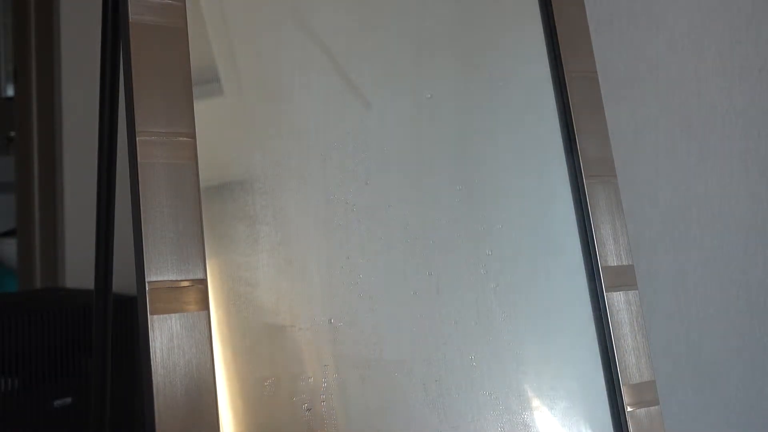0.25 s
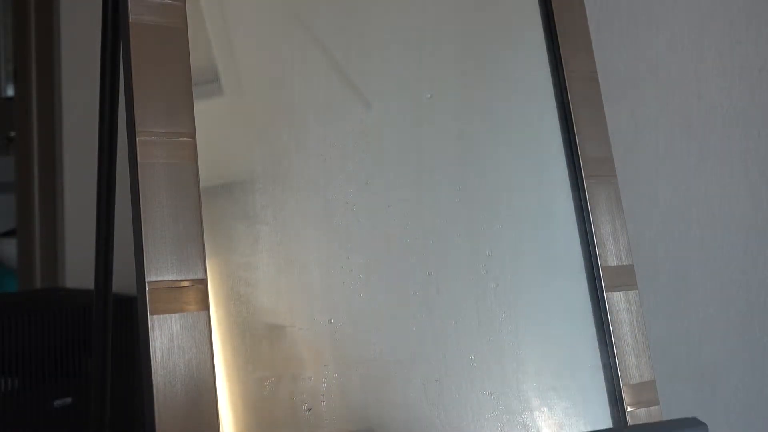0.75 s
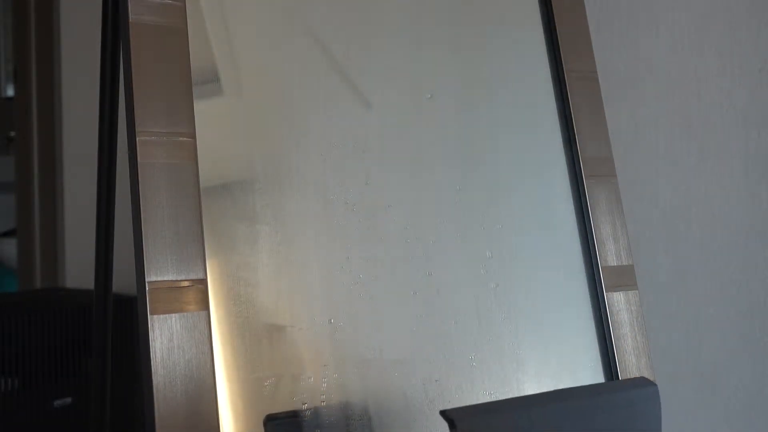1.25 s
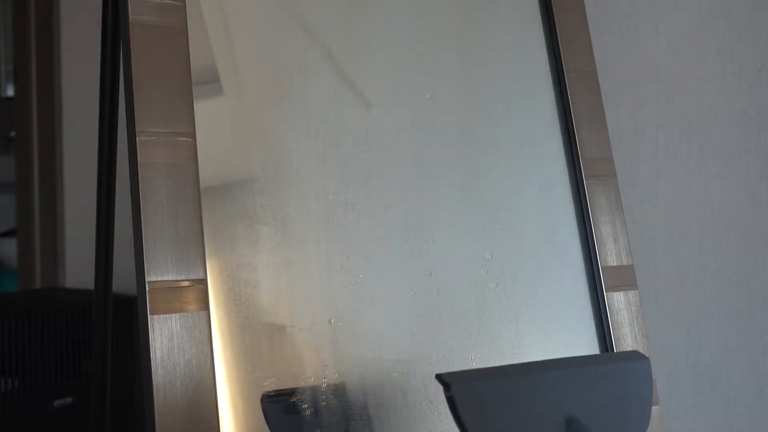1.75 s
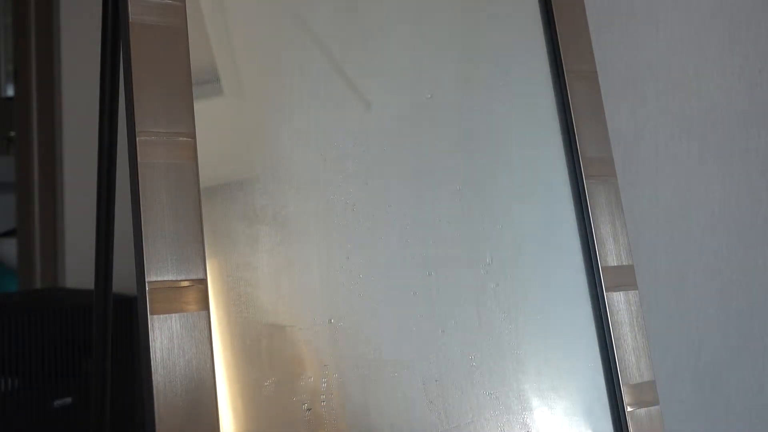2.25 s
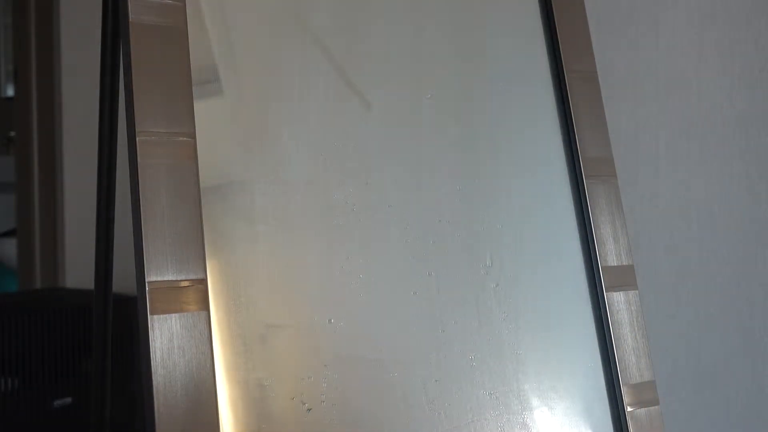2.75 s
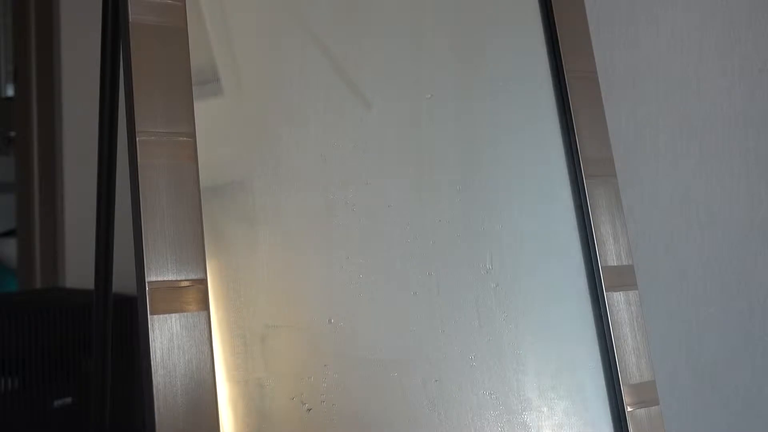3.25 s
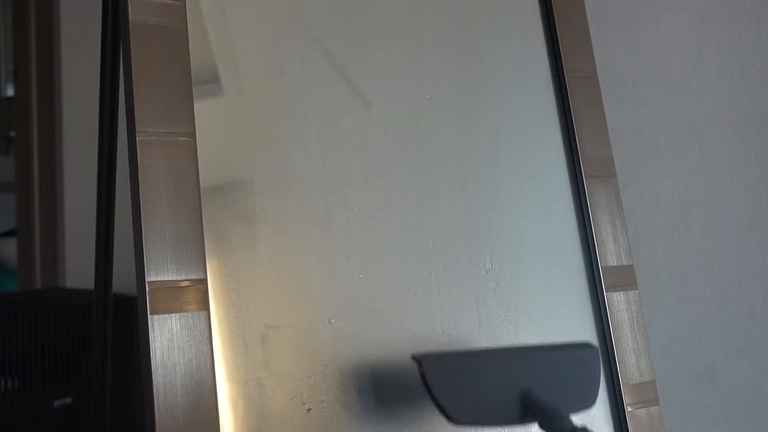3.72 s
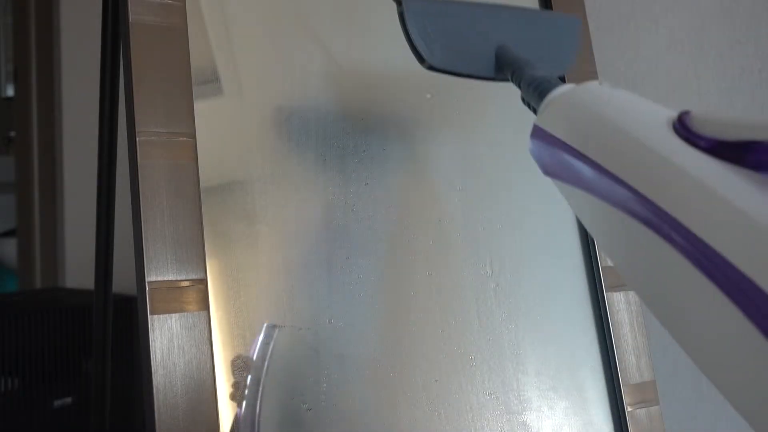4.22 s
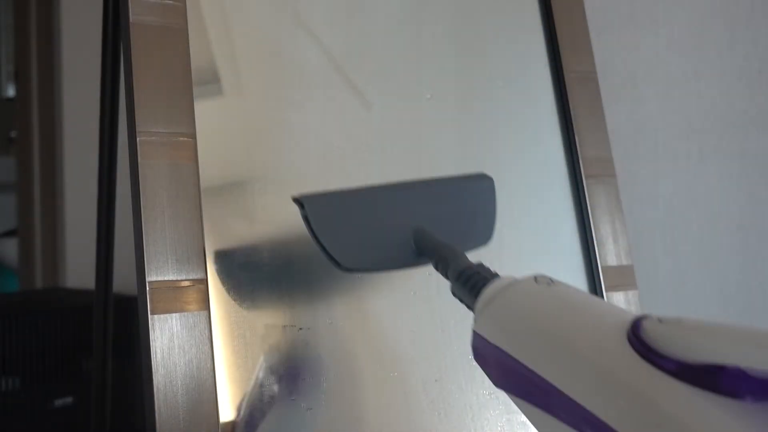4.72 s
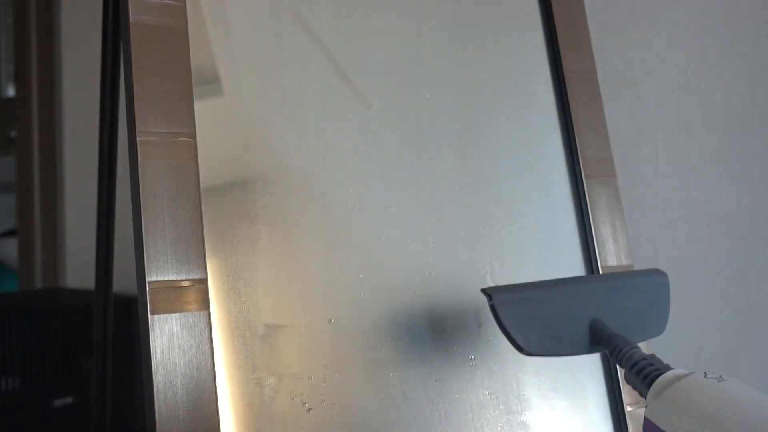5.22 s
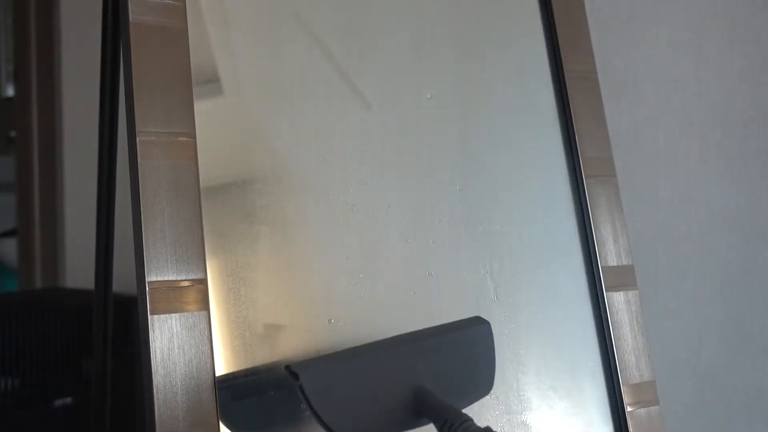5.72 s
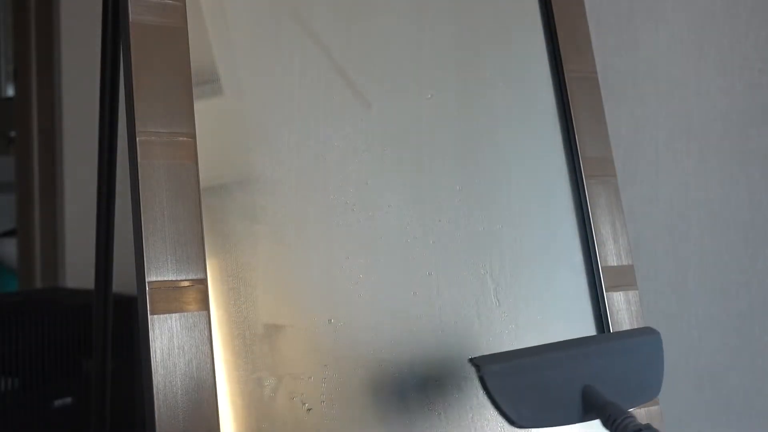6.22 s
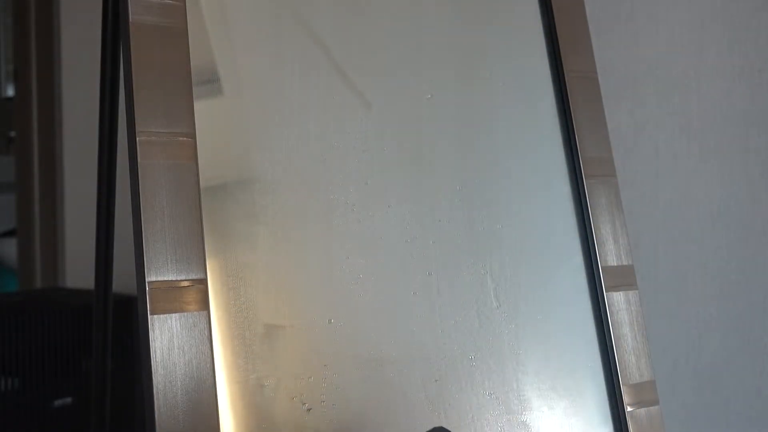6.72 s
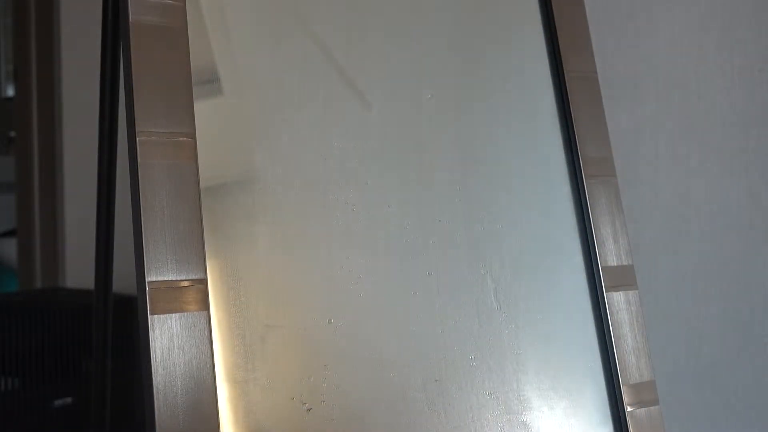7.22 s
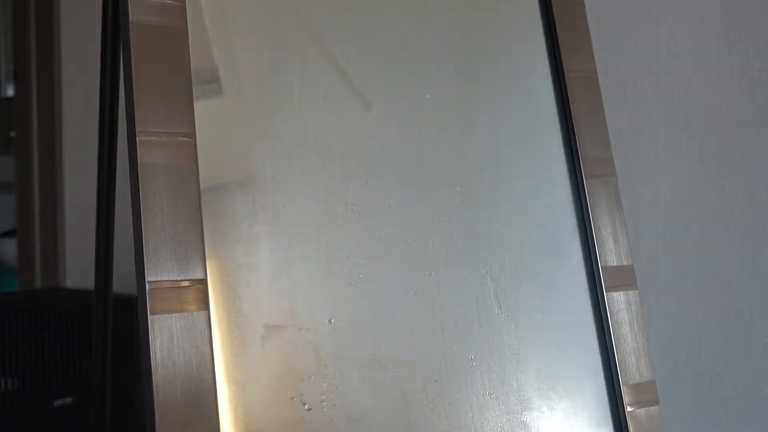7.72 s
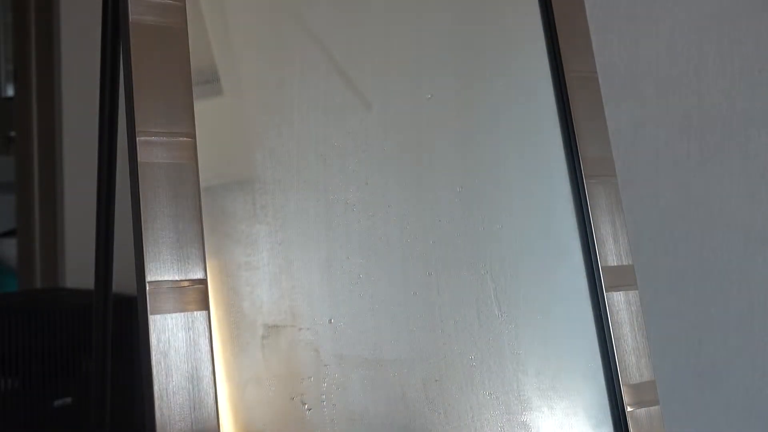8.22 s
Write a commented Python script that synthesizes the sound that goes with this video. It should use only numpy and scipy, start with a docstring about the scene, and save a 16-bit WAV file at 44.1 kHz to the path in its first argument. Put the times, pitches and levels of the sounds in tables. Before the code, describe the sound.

A handheld steam cleaner hisses loudly and steadily close by in a small room, whooshes once, then sags and fades with a falling whistle.

```python
"""A handheld steam cleaner is swept over a mirror in a small room, close to the microphone.
Turbulent hiss and its echo off the glass comb each other, and the hiss deepens at each pass of the head.
A breathy resonance whistles and sinks; then the nozzle is lifted once and high noise bands whoosh by.
As the pressure runs out the hiss fades under a second falling whistle and the ring of the head's cavity.
Last come a faint tick, a soft knock of decaying body modes and the thin singing of the wet slit."""
import sys
import numpy as np
from scipy import signal
from scipy.fft import rfft, irfft
from scipy.io import wavfile
from scipy.ndimage import uniform_filter1d, map_coordinates

SR = 44100
rng = np.random.default_rng(int(sys.argv[2]) if len(sys.argv) > 2 else 0)


def master(y):
    """Save y as 16-bit WAV."""
    cut = np.clip(np.atleast_2d(y).T, -1, 1)
    pcm = np.round(cut * 32767)  # scale
    wavfile.write(sys.argv[1], SR, pcm.astype(np.int16))


N = 373086
TIME = np.arange(N) / SR
BINS = np.maximum(np.fft.rfftfreq(N, 1 / SR), 1)   # Hz
CUTOFF_HZ = 15750

# echo off the glass, later as the nozzle draws back: [time_s, delay_ms, strength (0-1)]
GLASS_ECHO = [(0, .5, 0.4), (.37, 0.48, 0.39), (.8, 0.6, 0.35), (1.9, 0.61, 0.44), (2.5, 0.25, 0.3),
              (2.8, 0.2, 0.18), (3.2, .25, 0.28), (3.85, .2, 0.27), (4.1, 0.29, .2), (4.37, 0.44, 0.16),
              (4.7, 0.35, 0.23), (5.25, 0.27, 0.2), (5.85, 0.35, 0.37), (6.25, 0.3, 0.17),
              (6.85, 0.36, 0.57), (7.5, .28, 0.37), (8.46, 0.36, 0.04)]
# side-to-side strokes of the nozzle at their turning points: [time_s, left_ear_lead_us]
STROKES = [(0, -14), (.25, -14), (.55, -13), (1.0, -4), (2.1, -2), (2.6, -3.5), (3.25, -13.5), (3.85, -7.5),
           (4.85, 10), (5.22, -9), (5.85, 9), (6.27, -8), (6.7, 14), (7.05, 6), (7.5, -28)]
# steam flow, steady, sagging, then running out: [time_s, level_db (re full flow)]
STEAM_FLOW = [(0, 0), (1.9, -0.5), (3.3, -0.25), (4.0, -3), (4.8, -3.1), (5.9, -3), (6.6, -9.5),
              (7.0, -19.5), (7.38, -30), (7.85, -38), (8.46, -63)]
# low modes of the room: [centre_hz, width_hz, lift_db]
LOW_MODES = [(233, 29, 5), (332, 24, 5.5), (424, 25, 3)]


def from_db(db):
    """Amplitude ratio of a level: 20 dB per factor of ten."""
    return 10 ** (np.asarray(db) / 20)


def rms_one(x):
    """Normalisation to unit mean power."""
    return x / np.sqrt(np.mean(x ** 2) + 1e-20)


def in_time(rows):
    """Linear interpolation of each column of a curve to every sample."""
    s, *columns = np.transpose(rows)
    return [np.interp(TIME, s, column) for column in columns]


def at_hz(points, hz):
    """Interpolation of a spectrum on a log-frequency axis."""
    known_hz, values = np.transpose(points)
    return np.interp(np.log(hz), np.log(known_hz), values)


def swell(s, half_width_s):
    """Gaussian pulse of height 1 around a moment, falling to 1/e at the half width."""
    return np.exp(-((TIME - s) / half_width_s) ** 2)


def drift(rate_hz):
    """Low-passed random process of unit power: two equal poles at the rate, run at SR / 20."""
    pole = np.exp(-40 * np.pi * rate_hz / SR)
    noise = rng.standard_normal(N // 20 + 2002)
    slow = signal.lfilter([1], [1, -2 * pole, pole * pole], noise)[2000:]
    return np.interp(np.arange(N) / 20, np.arange(len(slow)), rms_one(slow))


def breathy_tone(hz, width_hz):
    """Narrow-band noise of unit power: random quadrature modulation of a moving carrier."""
    phase = 2 * np.pi * np.cumsum(hz) / SR
    in_phase = drift(width_hz) * np.cos(phase)
    quadrature = drift(width_hz) * np.sin(phase)
    return rms_one(in_phase + quadrature)


def low_pass(x, hz):
    """Gentle zero-phase treble loss, 6 dB down at the given frequency."""
    return irfft(rfft(x) / (1 + (BINS / hz) ** 2), N)


def lift_db(peaks):
    """Resonance curves as bumps on a level spectrum."""
    return sum(db / (1 + (2 * (BINS - hz) / width_hz) ** 2) for hz, width_hz, db in peaks)


def delayed(x, seconds):
    """Variable propagation delay by spline interpolation between samples."""
    return map_coordinates(x, [np.arange(N) - seconds * SR], order=5, mode="wrap")


def diffuse(pair, hz):
    """Interaural coherence: two unrelated spectra mix to ears alike in the bass, apart in the treble."""
    # likeness of the room sound in both ears: [frequency_hz, correlation]
    likeness = [(60, 0.95), (300, 1), (1000, 0.72), (2000, 0.8), (3200, 0.66), (5000, 0.066), (9000, -0.14),
                (15000, -0.14)]
    alike = np.clip(at_hz(likeness, hz), -1, 1)
    mid = np.sqrt((1 + alike) / 2) * pair[0]
    side = np.sqrt((1 - alike) / 2) * pair[1]
    return np.array([mid + side, mid - side])


def room(x, t60):
    """Reverberation as convolution with exponentially decaying noise, 0.2 s long, of unit energy."""
    t = TIME[:SR // 5]
    # the first reflections arrive after 1.5 ms
    tails = rng.standard_normal((2, len(t))) * from_db(-60 * t / t60) * (t > .0015)
    tails = irfft(diffuse(rfft(tails), np.fft.rfftfreq(len(t), 1 / SR) + 1))
    tails /= np.sqrt(np.sum(tails ** 2) / 2)
    return signal.oaconvolve(x[None], tails, axes=1)[:, :N]


def shifting_room(x, count):
    """Early reflection patterns cross-fade at equal power over a steady, diffuse late noise."""
    wash_t60_s, late_db = 0.12, -3.5
    hop = N // count + 1
    padded = np.pad(x, (hop, 2 * hop))
    fade = np.sin(np.pi * np.arange(2 * hop) / (2 * hop))
    early = np.zeros((2, len(padded) + SR))
    for start in range(0, N + hop, hop):
        piece = room(padded[start:start + 2 * hop] * fade, wash_t60_s)
        early[:, start:start + piece.shape[1]] += piece
    late = irfft(diffuse(rfft(rng.standard_normal((2, N))), BINS), N)
    return early[:, hop:hop + N] + from_db(late_db) * late


def ambience():
    """Diffuse-field noise of the quiet room at a slowly changing level, plus mains-hum sinusoids."""
    # colour of the quiet room: [frequency_hz, relative_db (per Hz)]
    air_colour = [(25, -2), (60, -0.5), (90, -1), (170, -3), (300, -2.5), (520, -7), (900, -6), (1350, -15),
                  (1800, -17.5), (2250, -6.5), (3500, -20.5), (5000, -15.5), (7000, -21), (15700, -19)]
    # level of the room noise: [time_s, level_db]
    air_level = [(0, -61), (1.5, -60), (3, -64), (4.5, -52.5), (6, -54.5), (8.46, -54.5)]
    # mains hum: [frequency_hz, rms_level_db]
    mains = [(60, -82.5), (119.5, -75.5)]
    noise = diffuse(rfft(rng.standard_normal((2, N))), BINS)
    air = irfft(noise * from_db(at_hz(air_colour, BINS) + lift_db(LOW_MODES)), N)
    hum = sum(np.sqrt(2) * from_db(db) * np.sin(2 * np.pi * hz * TIME) for hz, db in mains)
    return rms_one(air) * from_db(in_time(air_level)[0]) + hum


def knock():
    """Modal synthesis: a tap rings the short, damped modes of the plastic body."""
    # taps on the body: [start_s, relative_db]
    taps = [(8.018, -38)]
    # modes of the plastic body: [frequency_hz, relative_db, t60_s]
    modes = [(950, -2, .04), (1006, 4, .035), (1250, -12, 0.017), (2430, -16, .03)]
    room_t60_s, room_db = 0.39, -6
    out = 0
    for s, tap_db in taps:
        t = np.maximum(TIME - s, 0)
        ringing = sum(from_db(tap_db + db - 60 * t / t60) * np.sin(2 * np.pi * hz * t)
                      for hz, db, t60 in modes)
        out = out + ringing / 2
    ears = out * from_db([[-2], [2]])   # stronger on the right
    return ears + from_db(room_db) * room(out, room_t60_s)


def drop_ticks():
    """Damped oscillation: a water drop ticks on the glass as a very short decaying sine."""
    # ticks: [start_s, pitch_hz, level_db, t60_s]
    drops = [(7.808, 1600, -49, .008)]
    out = 0
    for s, hz, db, t60 in drops:
        t = np.maximum(TIME - s, 0)
        out = out + from_db(db - 60 * t / t60) * np.sin(2 * np.pi * hz * t)
    return out


def singing(width_hz):
    """Narrow-band resonance: the last steam sings thinly and high through the wet slit."""
    # one curve for each note: [time_s, pitch_hz, level_db]
    notes = [
        [(8.03, 13000, -85), (8.15, 13350, -72), (8.27, 13100, -75), (8.46, 13000, -69)],
        [(8.2, 10500, -88), (8.35, 10400, -75), (8.46, 10100, -74.5)],
    ]
    out = 0
    for rows in notes:
        hz, level_db = in_time(rows)
        started = TIME > rows[0][0]
        out = out + breathy_tone(hz, width_hz) * from_db(level_db) * started
    return out


def whistles(width_hz):
    """Noise-driven resonance: each whistle swells on a steady pitch, then slides down and fades."""
    # whistles of the nozzle:
    # [start_s, swell_s, sink_start_s, pitch_hz, level_db, sink_octaves_per_s, fade_db_per_s]
    tones = [(2.9, .9, 3.77, 1488, -42, .9, 24), (5.78, 0.19, 6.36, 1415, -46.5, 2.1, 12)]
    length_s = 1.45
    out = 0
    for start, swell_s, sinks_s, hz, db, octaves_per_s, fade_db_per_s in tones:
        sinking_s = np.maximum(TIME - sinks_s, 0)
        rise = np.clip((TIME - start) / swell_s, 0, 1)
        fall = np.clip((start + length_s - TIME) / swell_s * 2, 0, 1)
        tone = breathy_tone(hz * 2 ** (-octaves_per_s * sinking_s), width_hz)
        out = out + rise * fall * from_db(db - fade_db_per_s * sinking_s) * tone
    return out


def whoosh(width_hz):
    """Gliding noise bands in fixed ratios dip in pitch and rise again as the slit swings past."""
    # bands: [pitch_ratio, level_db (at the loudest moment)]
    bands = [(.82, -41), (1, -31), (1.11, -43), (1.22, -35.5)]
    lowest_hz, glide_hz_per_s, turn_s = 10800, 5400, 4.36
    loudest_s, half_width_s = 4.34, .52
    hz = lowest_hz + glide_hz_per_s * np.abs(TIME - turn_s)
    out = sum(from_db(db) * breathy_tone(np.minimum(ratio * hz, SR / 2), width_hz)
              for ratio, db in bands)
    return out * swell(loudest_s, half_width_s)


def head_ring():
    """Cavity resonance: the head's narrow ring fades more slowly than the jet."""
    ring_hz, width_hz = 3047, 115
    full_flow_db, db_per_flow_db = -42, 0.61
    level_db = full_flow_db + db_per_flow_db * in_time(STEAM_FLOW)[0]
    return breathy_tone(np.full(N, ring_hz), width_hz) * from_db(level_db)


def turbulence(flutter_db, surge_db, drops_per_s, drop_db):
    """Turbulent flow noise: white noise with random level modulation and impulses of spat droplets."""
    gas = rng.standard_normal(N) * from_db(flutter_db * drift(130) + surge_db * drift(12))
    drops = (rng.random(N) < drops_per_s / SR) * np.clip(rng.standard_normal(N), -2, 2)
    return gas + from_db(drop_db) * drops


def beside_mirror(source, left_db):
    """Comb interference of direct sound and glass echo, with interaural delay, head shadow and wall wash."""
    # the wash from the walls against the direct sound: [frequency_hz, relative_db]
    wash_colour = [(200, -1.5), (1000, -10), (3000, -1), (6000, -6.5), (8500, -0.5), (13000, 2.5)]
    glass_cut_hz = 16400
    shadow_hz, shadow_db_per_us = 5500, 0.25
    delay_ms, strength = in_time(GLASS_ECHO)
    lead_us = in_time(STROKES)[0]
    echo = low_pass(delayed(source, delay_ms / 1000), glass_cut_hz)
    near = source + np.clip(strength, 0, 1) * echo
    ears = np.array([near, delayed(near, lead_us / 1e6)])
    # only short waves are shadowed on their way to the far ear
    bass = low_pass(ears, shadow_hz)
    treble_db = (left_db + shadow_db_per_us * lead_us) * [[1], [-1]]
    ears = bass + (ears - bass) * from_db(treble_db)
    wash = rfft(shifting_room(near, count=54)) * from_db(at_hz(wash_colour, BINS))
    return ears + irfft(wash, N)


def jet(sputter_db):
    """Jet noise in four bands whose levels follow flow, side swing, gap to the glass and lift."""
    # where rush, hiss, sizzle and air meet: [frequency_hz]
    edges_hz = [1628, 4660, 9240]
    # colour of the jet within its bands: [frequency_hz, relative_db (per Hz)]
    colour = [(40, -73), (120, -43.5), (270, -32), (550, -27), (800, -21), (1300, -21), (1800, -15.5),
              (2350, -9), (3100, -2), (3900, -5.5), (5800, -9.5), (9000, -13.5), (11500, -21.5),
              (15700, -17)]
    # resonances that the hiss passes through: [centre_hz, width_hz, lift_db]
    peaks = [(3195, 600, 2.5), (2698, 270, 3), (12700, 1100, 2.5)]
    # rush, hiss, sizzle and air: [full_flow_db, db_per_flow_db, db_per_us (swing to the left),
    # db_per_ms (echo delay), lifted_db]
    balance = [(-40.5, -0.02, -0.0145, -9.5, -0.5), (-18, 1, 0.1274, 2, -1.5), (-26, 1.08, 0.0328, 0.5, -4),
               (-27.5, 1, -0.03, -0.5, 0)]
    # water briefly chokes the jet: [centre_s, half_width_s, change_db]
    chokes = [(4.772, 0.009, -3)]
    stall_db, stall_db_per_db = -12.5, 1.1   # below this flow the low rush dies faster
    flow_db, lead_us, delay_ms = in_time(STEAM_FLOW)[0], in_time(STROKES)[0], in_time(GLASS_ECHO)[0]
    lifted = swell(4.2, 0.23)   # up past the microphone and down again
    source = turbulence(flutter_db=1.0, surge_db=0.41, drops_per_s=80, drop_db=12.0)
    colour_db = at_hz(colour, BINS) + lift_db(peaks) + lift_db(LOW_MODES)
    rest = rfft(beside_mirror(source, left_db=2.0)) * from_db(colour_db)
    parts = []
    for edge_hz, (full_db, by_flow, by_swing, by_gap, lifted_db) in zip(edges_hz + [CUTOFF_HZ], balance):
        below = rest / (1 + (BINS / edge_hz) ** 16)
        rest = rest - below
        part = irfft(below, N)
        # even out the band's running power over 1/12 s, then give it its level
        power = uniform_filter1d(part.mean(axis=0) ** 2, size=SR // 12)
        level_db = full_db + by_flow * flow_db + by_swing * lead_us + by_gap * delay_ms + lifted_db * lifted
        parts.append(part / np.sqrt(power) * from_db(level_db))
    rush, hiss, sizzle, air = parts
    stalled_rush = rush * from_db(stall_db_per_db * np.minimum(flow_db - stall_db, 0))
    out = stalled_rush + hiss + sizzle + air
    choke_db = sum(depth_db * swell(s, half_width_s) for s, half_width_s, depth_db in chokes)
    return out * from_db(choke_db + sputter_db * drift(51))


def deepened(x):
    """Time-varying band gain: each pass of the head lifts the low edge of the hiss, shades the sizzle."""
    # the head swings through the middle of a stroke: [centre_s, half_width_s, strength]
    passes = [(2.863, 0.15, 0.65), (4.43, 0.37, .7), (4.94, 0.16, .9), (5.57, 0.097, 0.8),
              (5.984, 0.089, 0.74), (6.498, 0.073, 0.73)]
    # what a pass does to the hiss: [centre_hz, half_width_hz, change_db (at strength 1)]
    bands = [(2330, 540, 3), (7440, 1600, -7.5)]
    passing = sum(strength * swell(s, half_width_s) for s, half_width_s, strength in passes)
    spectrum = rfft(x)
    for hz, half_width_hz, db in bands:
        band = irfft(spectrum * np.exp(-((BINS - hz) / half_width_hz) ** 2), N)
        x = x + band * (from_db(db * passing) - 1)
    return x


def scene():
    """Superposition of room, knock, tick, nozzle tones and jet."""
    steam = deepened(jet(sputter_db=-0.51)) + head_ring()
    swish = whoosh(width_hz=680)
    last_steam = np.array([singing(width_hz=350) for ear in range(2)])
    return steam + swish + whistles(width_hz=45) + last_steam + drop_ticks() + knock() + ambience()


def record(dry):
    """Band limitation: an elliptic low-pass cuts the top steeply."""
    return signal.sosfilt(signal.ellip(14, .1, 80, CUTOFF_HZ, fs=SR, output="sos"), dry)


dry = scene()
out = record(dry)
master(out)
```